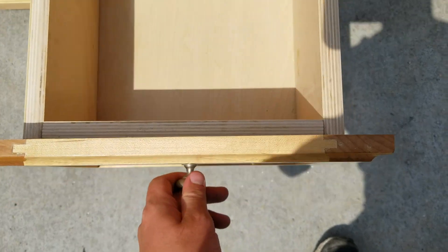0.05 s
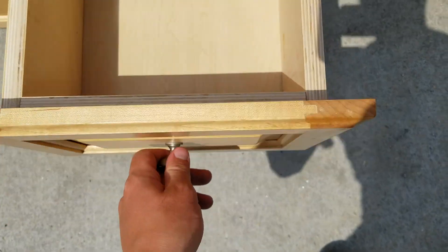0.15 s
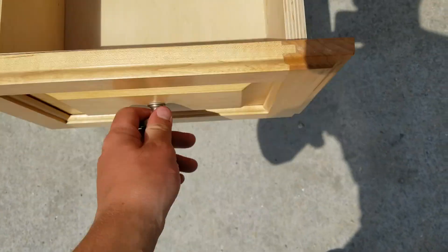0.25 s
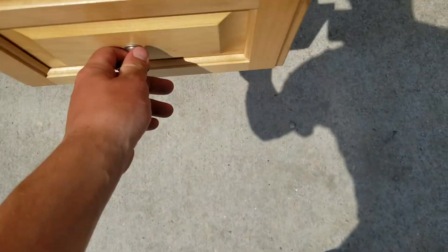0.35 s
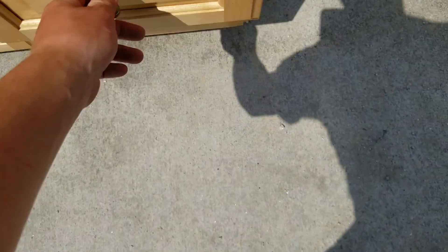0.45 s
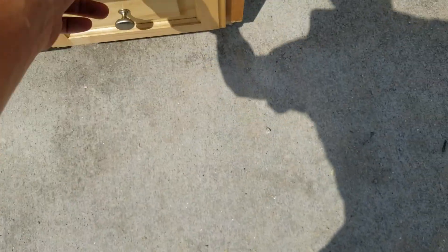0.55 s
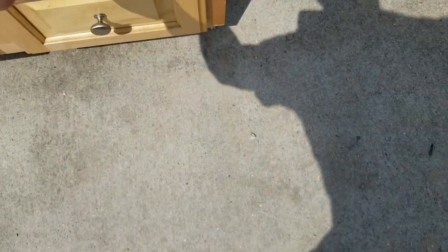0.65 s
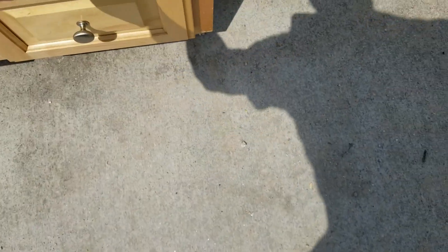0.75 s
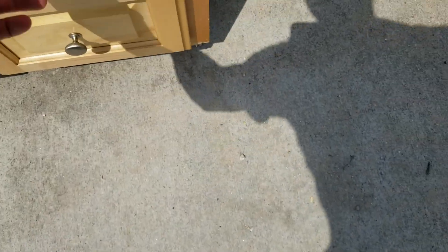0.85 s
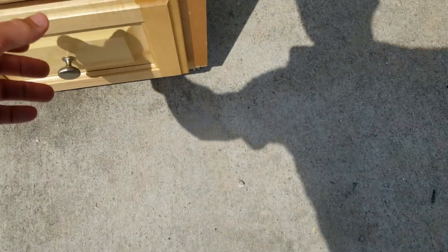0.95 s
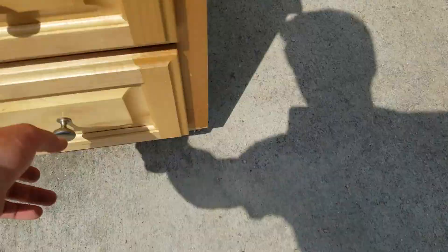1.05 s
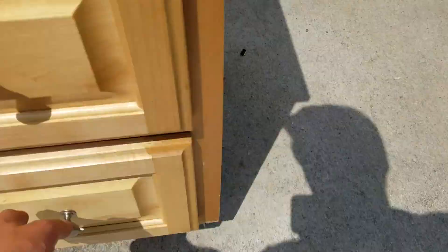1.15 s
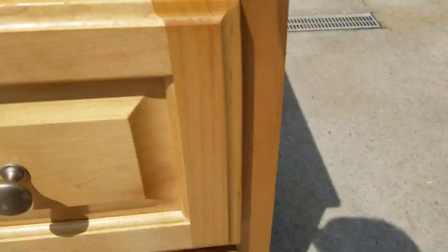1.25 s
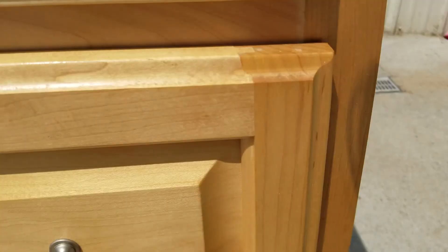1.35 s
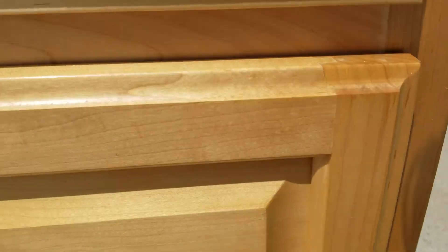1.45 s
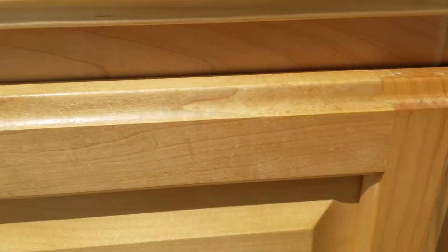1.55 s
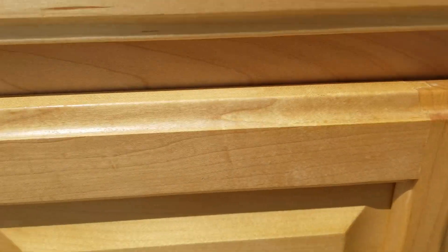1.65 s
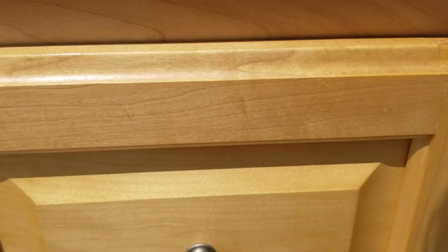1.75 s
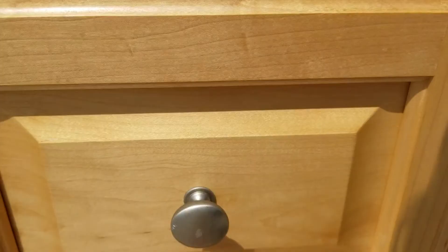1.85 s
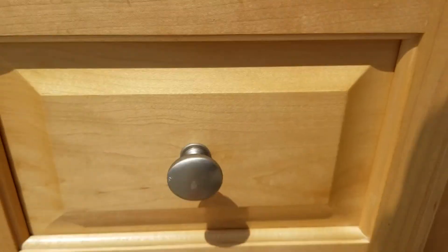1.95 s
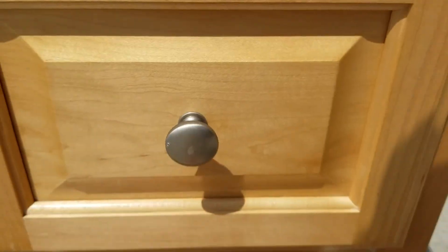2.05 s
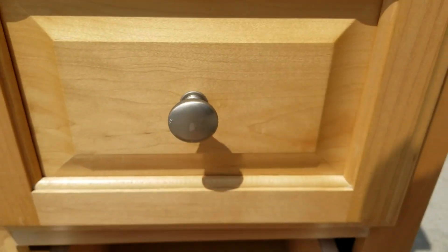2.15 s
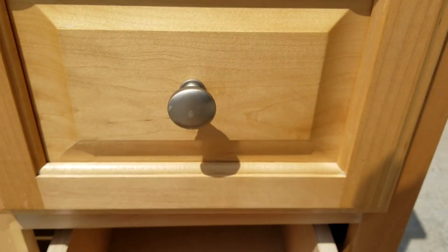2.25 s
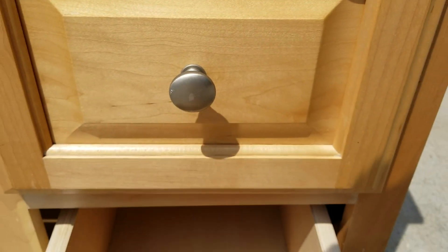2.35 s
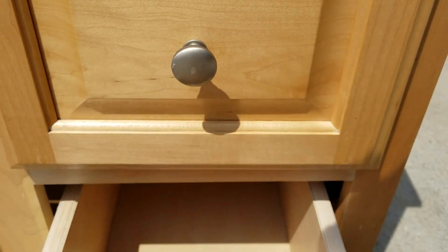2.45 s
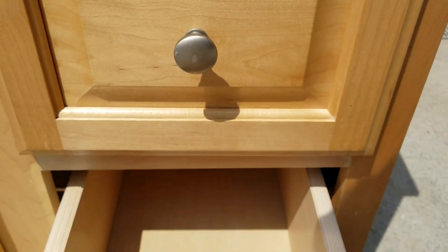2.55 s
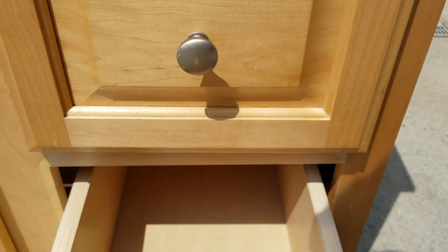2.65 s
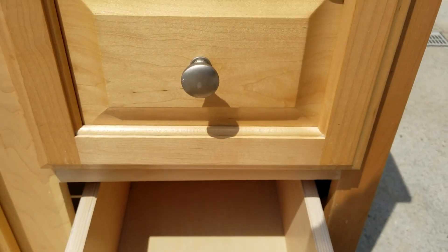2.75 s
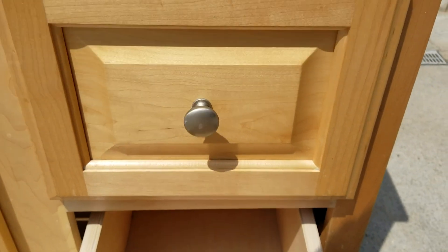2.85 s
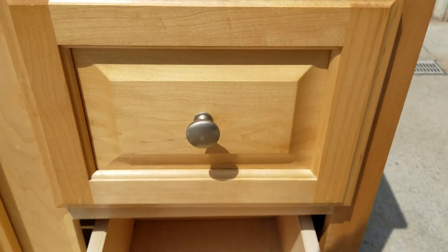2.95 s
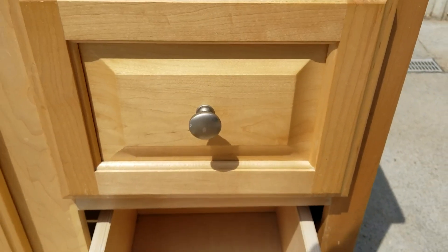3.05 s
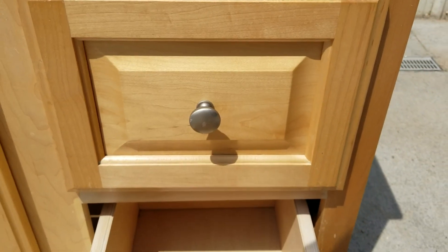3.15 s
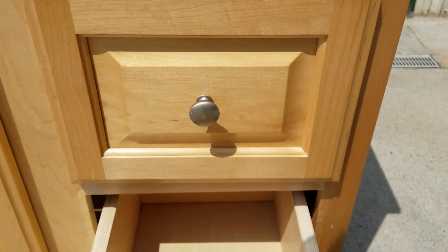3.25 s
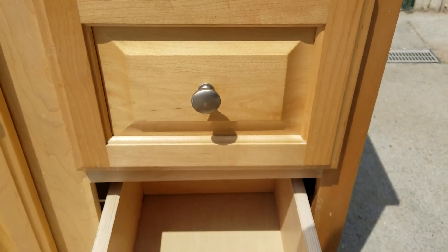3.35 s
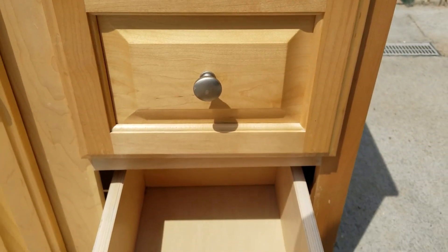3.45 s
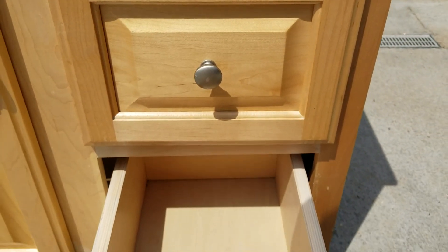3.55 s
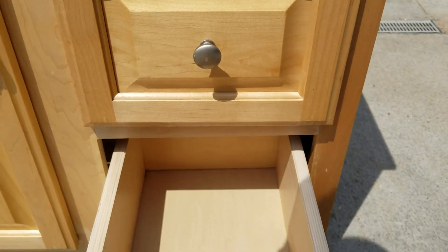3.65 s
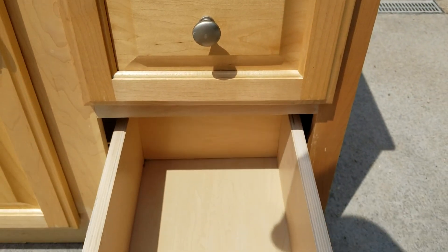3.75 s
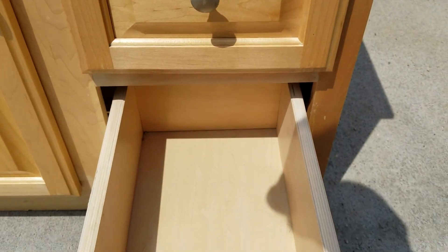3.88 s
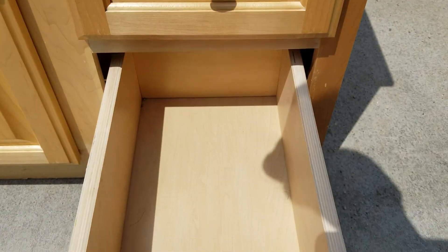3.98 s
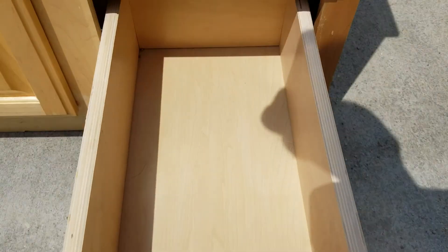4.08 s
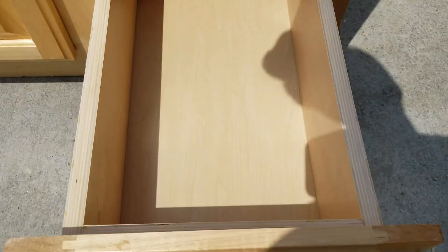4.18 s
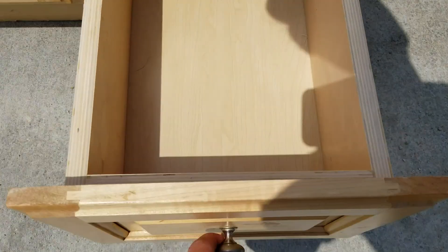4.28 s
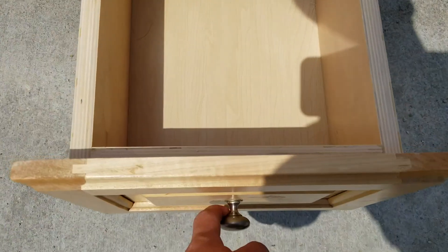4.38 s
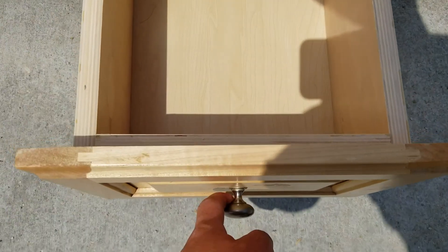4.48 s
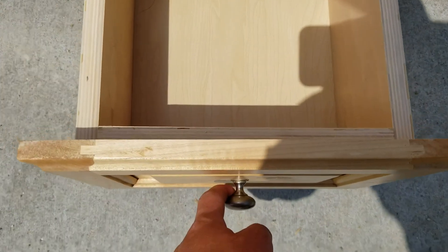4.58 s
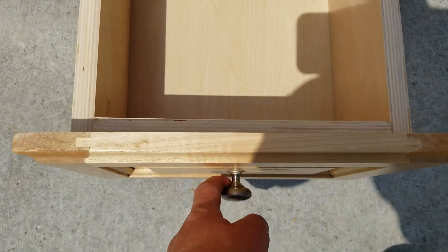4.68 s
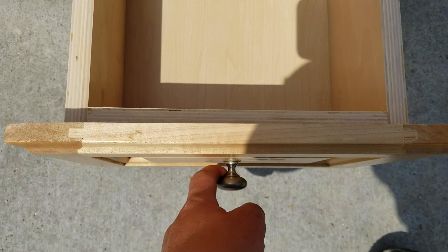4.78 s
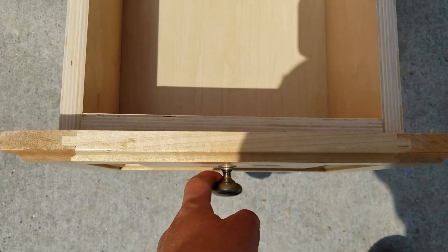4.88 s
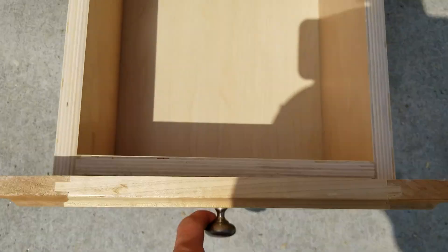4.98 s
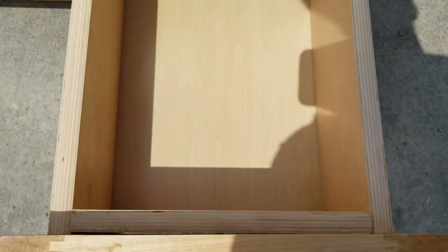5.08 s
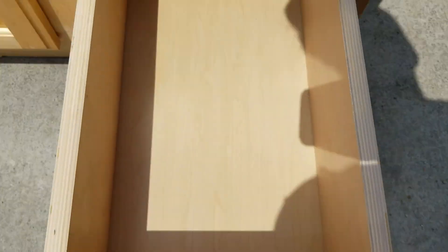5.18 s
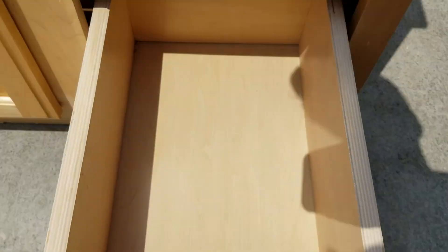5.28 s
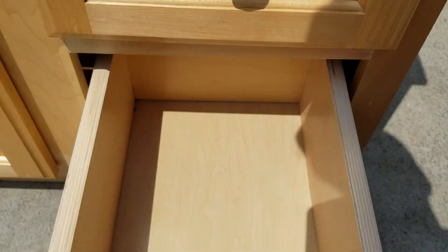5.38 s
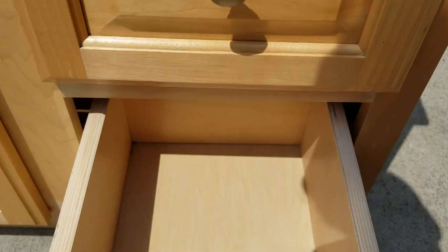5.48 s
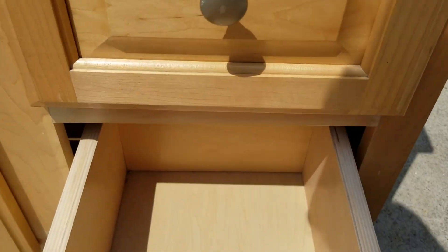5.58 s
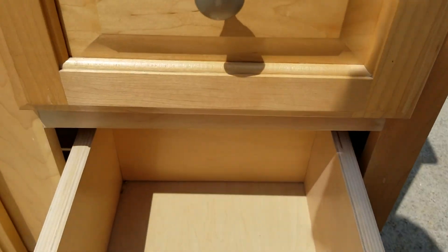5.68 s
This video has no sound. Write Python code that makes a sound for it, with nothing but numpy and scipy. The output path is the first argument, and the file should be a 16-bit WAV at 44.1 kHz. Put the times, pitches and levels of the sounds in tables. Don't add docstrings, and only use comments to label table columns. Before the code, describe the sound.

Close by, a wooden drawer is pushed shut with a loud, groaning scrape and hard multiple slam that rattles the cabinet. Shoes drag and small clicks follow. A lower drawer slides out much more quietly, pauses, then is pulled sharply to its stop with a hollow knock. Faint clicks end it. Handheld stereo microphone outdoors on concrete, with low wind and distant town hum.

```python
import sys
import numpy as np
from scipy import signal
from scipy.fft import rfft, irfft
from scipy.io import wavfile
from scipy.ndimage import uniform_filter1d

SR = 44100
rng = np.random.default_rng(int(sys.argv[2]) if len(sys.argv) > 2 else 0)


def generate_wav(sig):
    pcm = np.round(np.clip(np.atleast_2d(sig).T, -1, 1) * 32767).astype(np.int16)
    wavfile.write(sys.argv[1], SR, pcm)


def gain_from_decibels(decibels):
    exponent = np.asarray(decibels, float) / 20
    return 10 ** exponent


N = 252252
HZ = np.fft.rfftfreq(8192, 1 / SR)

# time in seconds, load in dB, bite (grip above usual) in dB.
STROKES = [
    [(0.0, -45.5, 0), (0.126, -40.5, -12), (0.24, -40.5, -4), (0.298, -35, 1.5), (0.482, -39.5, 3),
     (0.558, -41.5, 9.5), (0.628, -46.5, 5.5), (0.645, -40, 3)],
    [(1.95, -58, -4), (2.016, -61.5, 10), (2.14, -52, 3.5), (2.29, -49.5, 1), (2.382, -46.5, 2),
     (2.524, -53.5, 2), (2.668, -54, 4.5), (2.79, -55, 4.5), (2.9, -68, -3)],
    [(3.42, -57.5, 5), (3.502, -55.5, 2.5), (3.588, -61, 8.5), (3.64, -44, 1.5), (3.766, -38, -15),
     (3.802, -34, -4.5), (3.856, -33, -4), (3.95, -45, -0.5), (4.1, -58.5, -8)],
]
# thrum, scrape and fizz level over the load, all in dB.
REGISTERS = [
    (1.5, -11, -25.5),
    (-1, -8, -14.5),
    (-5, -17, -27.5),
]
THRUM_BITE, FIZZ_BITE = 0.27, 0.9
# frequency in Hz, width in Hz, rise in dB.
SHUTTING_BODY = ([(35, -45), (60, -13.5), (160, -7.5), (193, -5.5), (469, -7), (607, 0.5), (732, -16),
                  (924, -6.5), (1110, -15), (3580, -40.5), (4420, -44.5), (7570, -62.5), (12400, -55.5),
                  (16000, -64)], [(232, 180, 6), (250.5, 30, 4), (602.7, 180, 2.5), (890, 26, 6),
                  (1990, 110, 7.5), (2341, 63, 5), (3000, 110, 14), (4620, 180, 4), (6070, 500, 6),
                  (7700, 900, -10), (10000, 2000, 5)])
OPENING_BODY = ([(35, -23), (60, -19.5), (127, -6), (217, -6.5), (408, 1), (566, -6), (621, -2), (715, -7),
                 (1060, -4.5), (1280, -10.5), (2050, 1), (7570, -47), (12700, -37), (16000, -47)],
                 [(129, 18, 8.7), (458, 230, 8.3), (634, 25, 7.6), (1110, 400, 3.7), (1490, 71, 2.5),
                 (2100, 98, 3.3), (2740, 390, 5.7), (4930, 170, 6.4), (6600, 500, 7)])
BUMPING_BODY = ([(35, -44), (60, -18.5), (108, -5), (323, -6.5), (437, 3), (540, -13.5), (593, -9.5),
                 (732, -15.5), (1040, -18.5), (1280, -20.5), (3500, -26), (4030, -36), (4530, -37),
                 (16000, -66)], [(118, 51, 7.5), (250, 28, 7), (420, 56, 1.5), (604.5, 27, 9.5),
                 (1030, 48, 7.5), (2100, 36, 7), (7700, 930, -18), (10000, 1300, 6.5)])
SLAM_BODY = ([(35, -37.5), (60, -14.5), (118, 1), (274, -2), (354, -18), (480, -15), (803, -23),
              (1010, -23.5), (1700, -27.5), (2520, -34.5), (4750, -40.5), (7400, -57), (11800, -62.5),
              (16000, -68.5)], [(497, 40, 6), (1060, 180, 11), (1960, 75, 7.5), (2560, 260, 7),
              (2920, 300, 4.5), (4960, 180, 2.5), (1550, 350, -5.5), (4200, 400, -5), (7400, 1100, -9)])
SOLE_BODY = ([(59, -25), (100, -3), (343, -0.5), (481, -2.5), (1080, -12.5), (1870, -21.5), (2080, -23),
              (2930, -24), (3120, -32), (6150, -38), (7290, -62), (9500, -46), (13200, -42.5),
              (16000, -50)], [])
# time in seconds, strength, weight and hardness in dB, t60 in seconds.
KNOCKS = [(0.291, -27.5, -8, -16, 0.47), (0.354, -32, -9, -6, 0.23), (0.434, -24, -28, -4, 0.027),
          (0.464, -30.5, -16, -7, 0.071), (0.571, -29.5, -5, -11.5, 0.13), (0.608, -29, -10, -16, 0.024),
          (2.177, -42, -20, -18, 0.034), (2.307, -54, -7, 7, 0.13), (2.592, -50, 7, -4, 0.043),
          (3.469, -43, -24, -26, 0.14), (3.619, -45.5, -0.5, 6, 0.07), (3.666, -40, -2, -9, 0.06),
          (3.714, -36, -20, -10, 0.08), (3.758, -37, -8.5, -17, 0.053), (3.788, -28, -14, -12, 0.06),
          (3.826, -30.5, -25, -0.5, 0.06), (3.833, -31, -15, -2.5, .05), (3.863, -32, 1.5, -17, 0.065)]

# frequency in Hz, level in dB per Hz.
WIND_COLOUR = [(8.8, -44.5), (15, -8.5), (75, 0), (210, -13), (250, -11), (320, -33), (550, -120)]
TOWN_COLOUR = [(29, -19), (50, 1.5), (75, -3), (139, -13), (182, -7.5), (212, -15.5), (247, -2.5),
               (283, -10.5), (525, -5), (701, -11.5), (1030, -13), (1350, -20.5), (2600, -26.5),
               (5000, -48), (6500, -96.5), (11000, -120)]
LEAF_COLOUR = [(2350, -40.5), (4000, -2.5), (4930, -3.5), (6470, -8.5), (9830, -5), (12600, 1.5),
               (15200, -6.5), (16000, -16)]
# frequency in Hz, likeness from 0 to 1.
FAR_LIKENESS = [(60, .9), (500, 1), (1500, 0.34), (4000, 0.3), (15000, 0.045)]
# frequency in Hz, level in dB.
FAR_LEFT = [(60, 0.5), (240, 0.76), (950, 1.4), (3770, 0.57), (15000, 2.0)]
# time in seconds, top in dB, fall on both sides in dB per second.
GUSTS = [(0.0, -36, 330), (.3, -43, 15), (0.95, -42.5, 20), (1.38, -43, 104), (2.3, -61, 45),
         (3.4, -59.5, 19), (3.82, -36.5, 280), (4.41, -61, 25), (5.1, -65, 28), (5.72, -57.5, 14)]
RUMBLE_SURGES = [(.5, -36.5, 30), (3.81, -44.5, 49.7)]
LEAF_STIRS = [(.44, -61.5, 52), (1.27, -70, 40), (2.55, -71.5, 22), (3.79, -74, 15), (5.72, -76.5, 6)]

# time in seconds, peak in dB, pitch in Hz, left over right in dB.
TICKS = [(.07, -42, 1110, -2), (0.159, -46, 926, 11), (1.038, -37.5, 2430, 13), (1.115, -37, 1090, 9),
         (1.129, -42, 2000, 3), (1.144, -41, 2500, -3), (1.163, -41, 1200, 4), (1.22, -30.5, 2030, -3),
         (1.37, -33.5, 2420, 4), (4.351, -51.5, 2100, -3.5), (4.376, -48.5, 1167, 2),
         (5.385, -47.5, 1435, 6.5)]
CHIPS = [(0.116, -31, 1740, 1), (1.205, -41, 2600, 0), (1.1, -42, 2400, 0), (1.2, -40, 1060, 3),
         (1.138, -41, 1300, 3), (1.328, -38, 1000, 2), (1.255, -42, 1000, 2), (5.545, -58, 4500, 0),
         (.431, -47, 5500, 0), (1.288, -33, 3300, 3), (1.731, -46, 1430, -11.5), (1.935, -40, 1280, 6),
         (5.051, -38, 1980, -1), (5.176, -47, 2100, 4), (5.6245, -39, 1350, -10)]
SNAPS = [(1.069, -36.5, 2700, 9), (1.286, -21.5, 2370, 7), (1.3355, -28, 2130, 7), (5.5, -40.5, 1540, -13),
         (5.522, -46, 1750, -8), (3.714, -37, 2400, 0), (3.62, -41, 5000, 0), (1.048, -39, 900, -5),
         (1.349, -34, 1700, 3), (5.051, -49, 3600, 0)]
POPS = [
    (1.048, -24, 317, -10),
    (1.2155, -25.5, 1030, 6),
    (1.300, -26.5, 580, 3),
    (1.346, -20.5, 767, 3),
    (1.688, -39.5, 217, -12),
    (5.5, -40.5, 373.3, 14),
]
PINGS = [(0.572, -32, 1315, 12), (0.571, -22, 500, 1), (.66, -15, 2950, 6), (.661, -27, 1960, 10),
         (0.692, -23.5, 2580, -3), (3.924, -58, 4500, 4), (3.47, -56, 1073, 4.5), (3.62, -34.5, 2110, -4),
         (3.619, -43, 2490, -4), (3.714, -32.5, 1034, 7), (3.83, -32, 1140, 4), (3.923, -49.5, 3370, 4)]
# width in Hz, width in Hz per Hz of pitch, t60 of the puff behind in seconds.
DAMPING = [
    (700, 0.055, 0.021),
    (170, 0.1, 0.019),
    (900, 0.28, 0.033),
    (30, 0.83, 0.017),
    (45, 0.032, 0.032),
]

# start in seconds, length in seconds, pitch in Hz, peak in dB.
GROANS = [(.12, 0.047, 213, -33.5), (.162, 0.047, 196, -25.5), (.213, 0.026, 226, -28),
          (.25, 0.044, 200, -28), (.288, .035, 201, -31), (.21, .06, 629, -37), (.285, 0.061, 614, -27),
          (.352, 0.036, 940, -34.5), (.372, .035, 250, -28.5), (.37, 0.046, 590, -33),
          (.455, 0.033, 602, -32), (.46, .04, 950, -36.5), (.49, 0.041, 240.5, -31.5),
          (.598, .03, 500, -33.5), (2.195, 0.089, 620, -43.5), (2.29, 0.11, 629, -44.5),
          (2.222, 0.034, 430, -45.5), (2.3, .06, 400, -46), (2.352, 0.051, 270, -43),
          (2.43, 0.054, 409, -43), (2.525, .03, 503, -43.5), (2.582, .035, 437, -38), (2.73, .06, 424, -43),
          (2.34, .04, 1050, -47), (3.632, 0.054, 258, -35.5), (3.735, 0.041, 600, -36),
          (3.797, .03, 390, -27), (3.832, .05, 440, -28), (3.885, 0.027, 430, -34), (3.97, .035, 425, -34),
          (3.785, .03, 120, -33), (3.828, .035, 125, -30), (3.585, .03, 450, -44), (3.64, .075, 440, -39),
          (3.72, .055, 445, -35), (3.712, .03, 1030, -40), (3.755, .03, 1050, -42), (3.786, .014, 480, -27),
          (3.815, .05, 615, -35), (3.9, .09, 120, -42), (4.0, 0.047, 420, -47), (3.9, .035, 1220, -49),
          (3.975, .03, 1050, -52), (.7, .05, 485, -26), (.752, .045, 480, -29), (.775, 0.054, 245, -31)]

# time in seconds, ring, thud and hardness in dB, t60 in seconds.
BLOWS = [
    (.659, -17, -14, .6, 0.036),
    (.665, -14, -19, -6.5, 0.11),
    (.678, -30, -26, 0, 0.022),
    (.684, -16.5, -15, -12, 0.027),
    (0.693, -19, -18, -0.34, 0.033),
    (.72, -32, -28, -3, .03),
    (.742, -38, -35, -2, .025),
    (.769, -36, -37, -2, 0.044),
    (.8, -42, -40, -2, .03),
]
# frequency in Hz, level in dB, t60 in seconds.
PANELS = [(102, -12, 0.1), (123, -8, 1.1), (82, -10, .1), (145, -8, .25), (179, -1, 0.25),
          (246.3, -14, 0.5), (263.4, -6.5, 0.3), (346, -6.5, 0.12), (372.2, -17, 0.37), (481, -13, 0.3),
          (570, -13, .08), (730, -14, .12)]
# time in seconds, t60 in seconds.
SEATING = (.815, 0.16)
# frequency in Hz, t60 in seconds.
YARD_ECHO = [(80, 0.22), (300, 0.47), (1000, 0.47), (3000, 0.52), (8000, 0.71)]

# start in seconds, length in seconds, load in dB, bite in dB, fade at both ends in dB.
SHUFFLES = [
    (.84, 0.5, -57.5, 0.5, 4),
    (1.278, 0.108, -50, 3, 11),
    (1.62, 0.224, -49.5, -11, 17.5),
    (5.431, .14, -59, -2.5, 16.5),
]
# time in seconds, level in dB.
CRACKS = [(1.572, -62), (1.935, -57), (5.464, -62), (5.478, -58), (5.485, -60), (5.492, -55.5), (5.5, -52),
          (5.511, -59), (5.522, -53), (5.545, -58), (5.6245, -55)]
# start in seconds, length in seconds, pitch in Hz, level in dB.
HUMS = [
    (2.071, 0.4, 1084, -54.5),
    (2.42, 0.39, 428, -53),
]

# frequency in Hz, level in dB.
PORT_APART = [(60, -8), (150, -13), (380, -10), (950, -4), (2380, 0), (5980, 0), (15000, 0)]
# frequency in Hz, lead in radians.
PORT_LEAD = [(60, .5), (250, 1.0), (1000, 1.4), (4000, 1.6)]


def evened(x):
    return x / np.sqrt(np.mean(x ** 2) + 1e-20)


def smooth(x, size):
    return uniform_filter1d(uniform_filter1d(x, size), size)


def read(points, hz):
    f, value = np.transpose(points)
    return np.interp(np.log(hz + 1), np.log(f + 1), value)


def add(mix, s, sound):
    part = mix[..., round(s * SR):][..., :sound.shape[-1]]
    part += sound[..., :part.shape[-1]]


def burst(t60, size=6000):
    return rng.standard_normal(size) * gain_from_decibels(-60 * np.arange(size) / SR / t60)


def causal(db):
    log_gain = np.maximum(np.r_[db, db[-2:0:-1]], -100) * np.log(10) / 20
    return np.fft.ifft(np.exp(signal.hilbert(log_gain).conj())).real[:2500]


def parts_of(body):
    colour, resonances = body
    db = read(colour, HZ)
    for f, width, rise in resonances:
        db = db + rise / (1 + (2 * (HZ - f) / width) ** 2)
    under = [0] + [1 / (1 + (HZ / edge) ** 8) for edge in (330, 1400, 4000)] + [1]
    parts = [causal(db + 10 * np.log10(b - a + 1e-9)) for a, b in zip(under, under[1:])]
    return [p / np.linalg.norm(p) for p in parts]


def struck(levels_db, parts):
    return sum(gain_from_decibels(db) * p for db, p in zip(levels_db, parts))


def travelling(x, streak_db):
    z = signal.stft(x, nperseg=1024, noverlap=768)[2]
    streaks = uniform_filter1d(rng.standard_normal(z.T.shape).T, size=2, axis=0)
    streaks = uniform_filter1d(streaks, size=20, axis=1)
    dense = np.minimum(np.arange(len(z)) / 30, 1)[:, None]
    gain = gain_from_decibels(streak_db * dense * evened(streaks))
    return signal.istft(z * evened(gain), nperseg=1024, noverlap=768)[1][:len(x)]


def rub(rows, parts, spread_db, judder_db):
    s, *levels_db = np.transpose(rows)
    t = np.arange(s[0], s[-1], 1 / SR)
    catch_db = spread_db * np.minimum(rng.exponential(1, len(t)), 6)
    catches = travelling(rng.standard_normal(len(t)) * gain_from_decibels(catch_db), streak_db=3.2)
    jolts = smooth(rng.standard_normal((len(t), 5)).T, 300)
    judder = evened(jolts[:4] + 0.6 * jolts[4])
    drives = catches * gain_from_decibels(judder_db * judder) * signal.windows.tukey(len(t), .08)
    out = 0
    for drive, level_db, part in zip(drives, levels_db, parts):
        load = gain_from_decibels(np.interp(t, s, level_db))
        out = out + signal.oaconvolve(evened(drive) * load, part)
    return s[0], out


def drawers():
    out = np.zeros(N)
    bodies = SHUTTING_BODY, OPENING_BODY, BUMPING_BODY
    for rows, (thrum, scrape, fizz), body in zip(STROKES, REGISTERS, bodies):
        parts = parts_of(body)
        levels = [(s, db + thrum + THRUM_BITE * bite, db, db + scrape + bite, db + fizz + FIZZ_BITE * bite)
                  for s, db, bite in rows]
        add(out, *rub(levels, parts, spread_db=2.5, judder_db=1.7))
        for s, db, weight, hard, t60 in KNOCKS:
            if rows[0][0] < s < rows[-1][0]:
                box = struck((db + weight, db, db + hard, db + hard - 12), parts)
                add(out, s, signal.oaconvolve(burst(t60), box))
    return out


def swells(rows, calm_db):
    t = np.arange(N) / SR
    return np.sqrt(gain_from_decibels(calm_db) ** 2 + sum(gain_from_decibels(db - fall * abs(t - s)) ** 2 for s, db, fall in rows))


def air(colour, same, left_db, patchy_db):
    frames, hz = N // 256 + 5, np.fft.rfftfreq(1024, 1 / SR)
    a, b, c, d, patches = rng.standard_normal((frames, 513, 5)).T
    patches = evened(uniform_filter1d(uniform_filter1d(patches, 14, 0), 16, 1))
    late = np.exp(-2j * np.pi * hz * .00035)[:, None]
    same = np.clip(read(same, hz), -1, 1)[:, None]
    tilt = gain_from_decibels(read(left_db, hz) / 2)[:, None]
    left = a + 1j * b
    right = same * left + np.sqrt(1 - same ** 2) * (c + 1j * d)
    z = np.array([left * tilt, right / tilt * late])
    z = z * gain_from_decibels(read(colour, hz)[:, None] + patchy_db * patches)
    return evened(signal.istft(z, nperseg=1024, noverlap=768)[1][:, :N])


def wind():
    likeness, left_db = [(30, 0.36), (200, 1.0)], [(30, 3.0), (200, 3.0)]
    return swells(GUSTS, calm_db=-71.5) * air(WIND_COLOUR, likeness, left_db, patchy_db=-1.0)


def town():
    return swells(RUMBLE_SURGES, calm_db=-55.5) * air(TOWN_COLOUR, FAR_LIKENESS, FAR_LEFT, patchy_db=0.5)


def leaves():
    return swells(LEAF_STIRS, calm_db=-79.5) * air(LEAF_COLOUR, FAR_LIKENESS, FAR_LEFT, patchy_db=1.4)


def small_things():
    out, t = np.zeros((2, N)), np.arange(1800) / SR
    grit = parts_of(SOLE_BODY)[3][:1800]
    for rows, (least, share, t60) in zip((TICKS, CHIPS, SNAPS, POPS, PINGS), DAMPING):
        for s, db, hz, pan_db in rows:
            width = least + share * hz
            ring = t * np.exp(-1.5 * np.pi * width * t) * np.sin(2 * np.pi * hz * t)
            ring = ring - ring.sum() * ring ** 2 / (ring ** 2).sum()
            drive = .06 * burst(t60, size=1800) + (t == 0)
            sound = np.convolve(drive, ring)
            grit_share = gain_from_decibels(-24) * min(.6 + width / 1100, 2)
            sound = gain_from_decibels(db) * (sound / abs(sound).max() + grit_share * np.convolve(drive, grit))
            apart = np.tanh(pan_db / 17) * sound + 0.55 * np.roll(sound, rng.integers(4, 30))
            add(out, s, np.array([sound + apart, sound - apart]))
    return out


def groans():
    out = np.zeros(N)
    for s, length, hz, db in GROANS:
        drift = evened(uniform_filter1d(rng.standard_normal((2, 6000)), size=300))
        wander, flutter = drift[:, :round(length * SR)]
        swell = np.sin(np.pi * np.linspace(0, 1, len(wander)) ** .75)
        tone = np.sin(2 * np.pi * np.cumsum(hz * (1 + .018 * wander)) / SR)
        add(out, s, gain_from_decibels(db + 2.5 * flutter) * swell * tone)
    return out


def slam():
    out, t, parts = np.zeros(N), np.arange(SR // 2) / SR, parts_of(SLAM_BODY)
    seats_s, seated_t60 = SEATING
    for s, ring_db, thud_db, hard, t60 in BLOWS:
        crack_db = thud_db + hard
        snap_db = crack_db - 10.5 + 2.5 * hard
        reach = gain_from_decibels(1.0 * rng.standard_normal(len(PANELS)))
        ring = 0
        for gain, (f, db, panel_t60) in zip(reach, PANELS):
            ring = ring + gain * gain_from_decibels(db - 60 * t / panel_t60) * np.sin(2 * np.pi * f * t)
        seated = gain_from_decibels(-60 * np.maximum(t + s - seats_s, 0) / seated_t60)
        loose = gain_from_decibels(2.01 * evened(smooth(rng.standard_normal(len(t)), 400)))
        add(out, s, -gain_from_decibels(ring_db) * ring * seated * loose)
        add(out, s, signal.oaconvolve(burst(t60), struck((thud_db, crack_db, snap_db), parts[1:])))
    hz, frame_s, z = signal.stft(rng.standard_normal(SR), SR, nperseg=256)
    decay = gain_from_decibels(-60 * frame_s / read(YARD_ECHO, hz)[:, None])
    rattle = signal.istft(z * decay, SR, nperseg=256)[1]
    yard = struck((-32.0, -22.5, -32.5, -48), parts_of((SLAM_BODY[0], [])))
    add(out, BLOWS[0][0] + 0.0022, signal.oaconvolve(rattle, yard))
    return out


def feet():
    out, parts = np.zeros(N), parts_of(SOLE_BODY)
    for s, length, load_db, bite, fade in SHUFFLES:
        rows = []
        for share, down in ((0, fade), (0.41, 0), (1, fade)):
            db = load_db - down
            thump_db = load_db - 5 - .4 * down
            rows.append((s + share * length, thump_db, db, db + bite, db + bite - 11.5))
        add(out, *rub(rows, parts, spread_db=4.5, judder_db=0.0))
    return out


def crunch():
    out = np.zeros((2, N))
    for s, db in CRACKS:
        puffs = [burst(.006, size=400), burst(0.0082, size=400)]
        add(out, s, gain_from_decibels(db) * signal.lfilter([1, -.6], 1, puffs))
    return out


def hums():
    out, t = np.zeros(N), np.arange(4000) / SR
    for s, length, hz, db in HUMS:
        mode = np.exp(-np.pi * hz / 11 * t) * np.sin(2 * np.pi * hz * t)
        sung = signal.oaconvolve(rng.standard_normal(SR // 2), mode)[4000:][:round(length * SR)]
        add(out, s, gain_from_decibels(db) * evened(sung) * np.sqrt(np.hanning(len(sung))))
    return out * gain_from_decibels([[1.5], [-1.5]])


def ports(x):
    hz = np.fft.rfftfreq(N, 1 / SR)
    echoes = rfft(burst(.09), N)
    scattered = 1 / (1 + (1300 / (hz + 1)) ** 2)
    lead = np.sqrt(1 - scattered) * np.exp(1j * read(PORT_LEAD, hz))
    scatter = np.sqrt(scattered) * evened(abs(echoes)) * np.exp(1j * np.angle(echoes))
    apart = irfft(rfft(x) * gain_from_decibels(read(PORT_APART, hz)) * (lead + scatter), N)
    return np.array([x + apart, x - apart])


def scene():
    close = ports(drawers() + groans() + slam() + feet())
    return close + wind() + town() + leaves() + small_things() + crunch() + hums()


def top_cut(x):
    return signal.sosfilt(signal.butter(12, 16570, fs=SR, output="sos"), x)


def record(dry):
    faded_in = dry * np.minimum(np.arange(N) / 150, 1)
    thin = signal.lfilter(*signal.butter(2, 45, "high", fs=SR), faded_in)
    edge = signal.firwin(255, 15950, fs=SR)
    mix = signal.oaconvolve(np.tanh(thin * 0.63) / 0.58, edge[None], "same")
    return top_cut(mix)


dry = scene()
out = record(dry)
generate_wav(out)
```